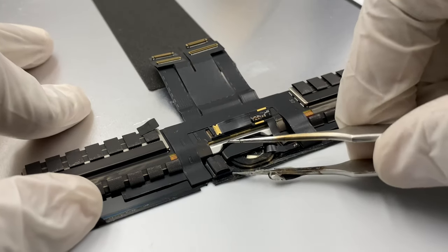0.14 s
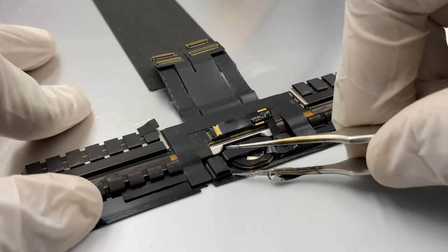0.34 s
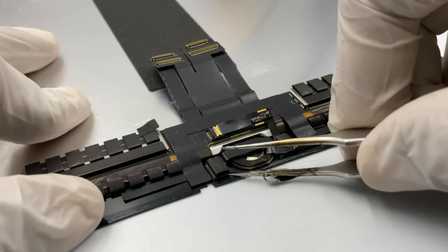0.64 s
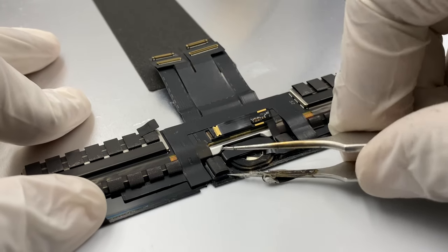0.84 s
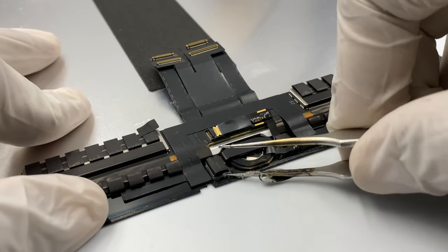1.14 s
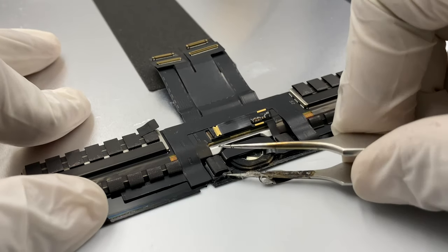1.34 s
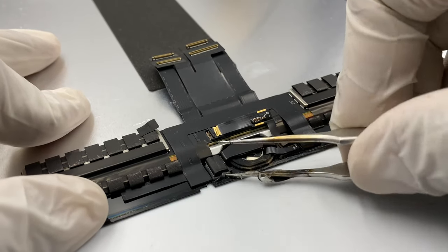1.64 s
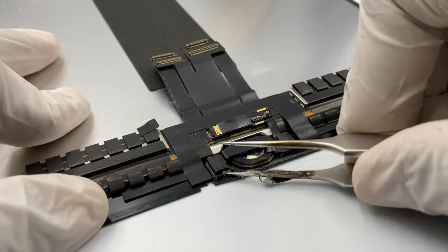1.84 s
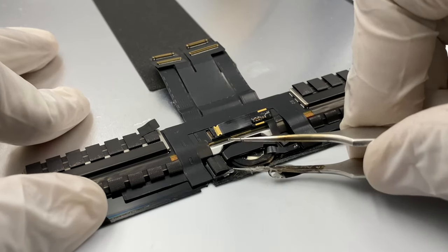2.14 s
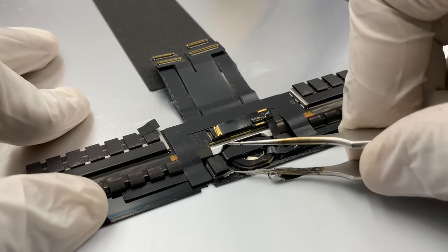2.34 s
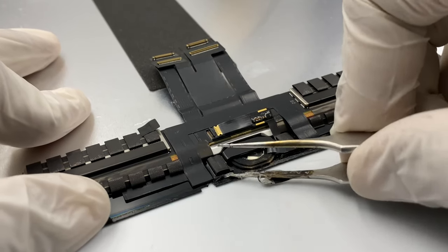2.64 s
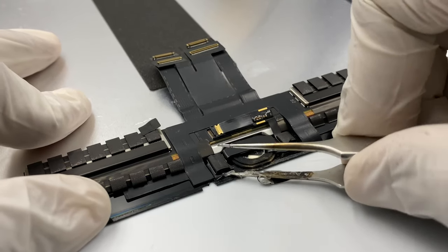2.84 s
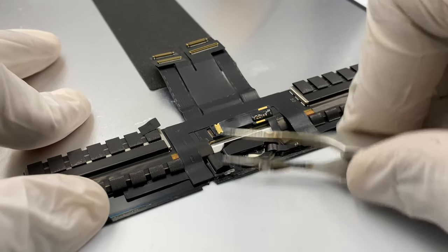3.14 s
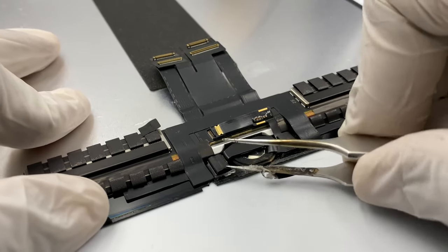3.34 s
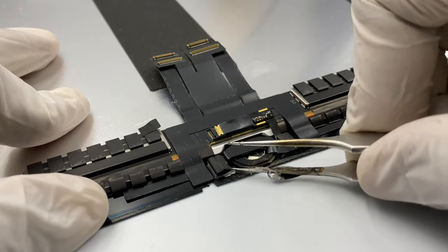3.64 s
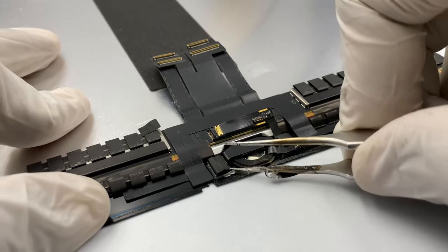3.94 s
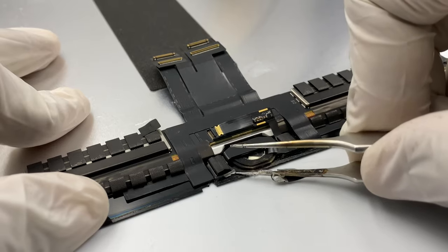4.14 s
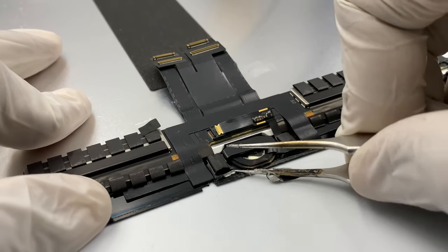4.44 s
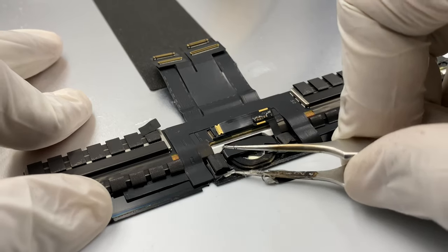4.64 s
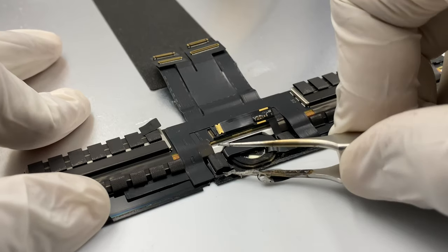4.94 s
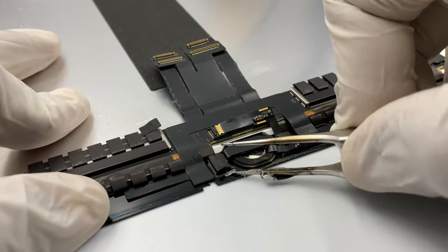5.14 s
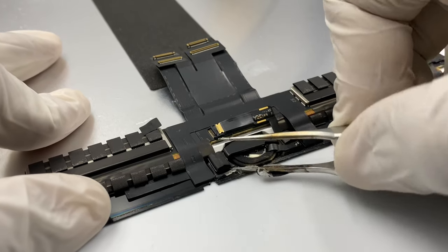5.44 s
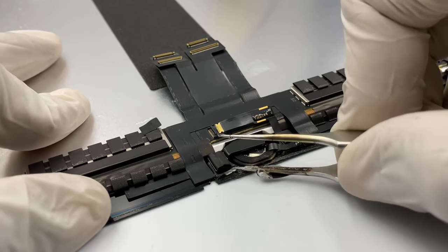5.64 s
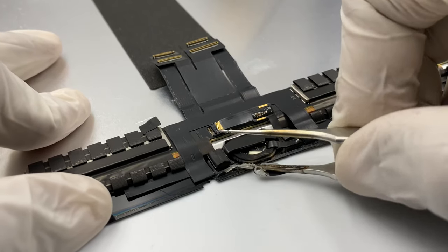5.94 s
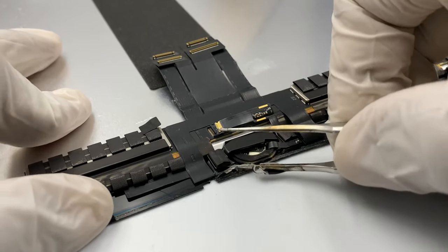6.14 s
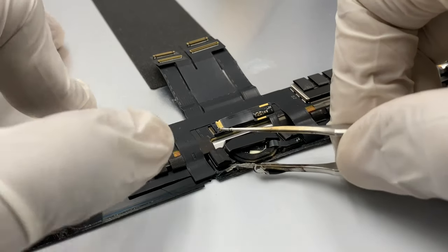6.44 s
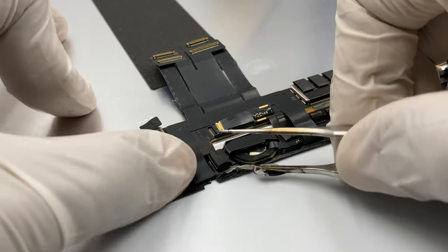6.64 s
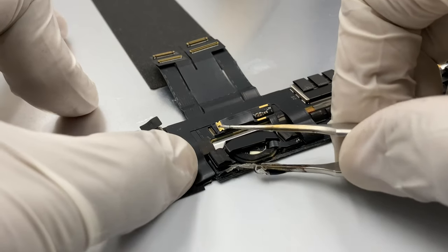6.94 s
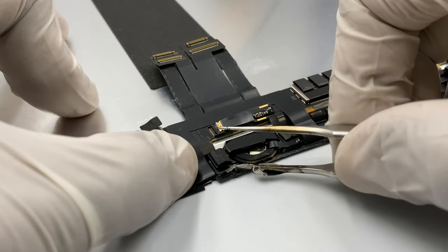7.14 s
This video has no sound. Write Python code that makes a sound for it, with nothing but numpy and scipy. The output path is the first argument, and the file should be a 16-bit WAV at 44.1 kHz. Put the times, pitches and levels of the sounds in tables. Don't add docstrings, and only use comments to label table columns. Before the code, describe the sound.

Close, dry metallic ticks and five sharp tweezer snaps, the last one loudest, with faint glove rubbing above a low constant fan drone.

```python
import sys
import numpy as np
from scipy import signal
from scipy.fft import rfft, irfft
from scipy.io import wavfile
from scipy.ndimage import uniform_filter1d

SR = 44100
rng = np.random.default_rng(int(sys.argv[2]) if len(sys.argv) > 2 else 0)


def gain_from_decibels(decibels):
    exponent = np.asarray(decibels, float) / 20
    return 10 ** exponent


def wav_record(signal):
    frames = np.transpose(np.atleast_2d(signal))
    bounded = np.clip(frames, -1, 1)
    quanta = np.round(bounded * 32767).astype(np.int16)
    wavfile.write(sys.argv[1], SR, quanta)


N = 321048
TIME = np.arange(N) / SR
HZ = np.maximum(np.arange(N // 2 + 1) * SR / N, 1)
SIDES = np.array([[1], [-1]])


def rms_one(x):
    return x / np.sqrt(np.mean(x ** 2) + 1e-20)


def in_time(rows):
    s, *columns = np.transpose(rows)
    return [np.interp(TIME, s, c) for c in columns]


def at_hz(rows, column=1, hz=HZ):
    table = np.array(rows)
    return np.interp(np.log(hz), np.log(table[:, 0]), table[:, column])


def drift(rate):
    r = np.exp(-80 * np.pi * rate / SR)
    slow = signal.lfilter([1], [1, -2 * r, r * r], rng.standard_normal(N // 40 + 2002))[2000:]
    return np.interp(np.arange(N) / 40, np.arange(len(slow)), rms_one(slow))


def pair(shared, lag_s, source):
    common, left, right = rfft(source)
    shared = np.clip(shared, 0, 1)
    late = np.exp(-2j * np.pi * np.minimum(HZ * lag_s, 3))
    together = np.sqrt(shared) * common * np.array([late, np.ones_like(late)])
    return together + np.sqrt(1 - shared) * np.array([left, right])


def ring(force, modes):
    out = 0
    for k, (hz, level_db, t60) in enumerate(modes):
        r = gain_from_decibels(-60 / (t60 * SR))
        w = 2 * np.pi * hz / SR
        gain = (-1) ** k * gain_from_decibels(level_db) * np.sin(w)
        out = out + signal.lfilter([0, gain], [1, -2 * r * np.cos(w), r * r], force + 1e-18)
    return out


def contacts(times, level_db, pan_db, rough, slip_s):
    t = np.arange(rough.shape[-1]) / SR
    slips = rough * t * np.exp(-t / slip_s)
    slips = slips / np.sqrt(np.sum(slips ** 2, axis=-1, keepdims=True))
    force = np.zeros((2, N + len(t)))
    for s, db, pan, slip in zip(times, level_db, pan_db, slips):
        start = round(s * SR)
        force[:, start:start + len(t)] += slip * gain_from_decibels(db + pan * SIDES / 2)
    return force[:, :N]


# frequency in Hz, level in dB, t60 in s.
TIP_MODES = [(7340, 2.5, 0.0032), (7960, -2, 0.0099), (8500, 1, 0.0057), (9220, 2, 0.01),
             (9850, 9.5, 0.0045), (10760, 6, 0.0068), (11470, 5.5, 0.0043)]
# frequency in Hz, level in dB, t60 in s.
BOARD_MODES = [(1215, 14, 0.0054), (1410, -12, 0.02), (1760, 7.5, 0.017), (1980, -2, 0.07),
               (2270, 7.5, 0.0075), (2850, 5, 0.012), (3340, 4.5, 0.012)]
# frequency in Hz, level in dB, t60 in s.
ARM_MODES = [(3350, 1.2, 0.0031), (4100, 2.3, 0.0054), (4450, 3.4, 0.0087), (4730, 5.4, 0.0077),
             (5580, 6.1, 0.0062), (6230, 4.7, 0.0037), (7030, 0.61, 0.0033)]
# frequency in Hz, level in dB, t60 in s.
EDGE_MODES = [(12300, -8, .005), (12750, 11.5, 0.0071), (14100, 8, 0.0079), (14800, 7, 0.006),
              (15600, 2, .003)]


def ticks(rows):
    s, tip_db, board_db, arm_db, edge_db = np.transpose(rows)
    rough = rng.standard_normal((len(s), 2, 260))
    crackle = rng.standard_normal((len(s), 2, 1200)) * rng.standard_normal((len(s), 1, 1200)) ** 2
    scuff_db, scuff_s = -12, 0.0062
    click = np.eye(1, 4096)
    out = 0
    for modes, db in ((TIP_MODES, -8.0), (BOARD_MODES, board_db - 6.0), (ARM_MODES, arm_db - 5.0),
                      (EDGE_MODES, edge_db)):
        force = contacts(s, tip_db + db, 0 * s, rough, slip_s=0.00041)
        force = force + contacts(s - scuff_s, tip_db + db + scuff_db, 0 * s, crackle, scuff_s)
        out = out + signal.oaconvolve(force, ring(click, modes), axes=1)
    return out[:, :N]


# time in seconds, tip ring peak in dB,
# then board, arm and edge in dB above the tip ring.
BOUNCES = [(3.125, -43.5, -5, 5.5, -10), (3.1362, -43.5, -6, -4, -5), (3.16, -25.5, -26, -6, -12),
           (3.165, -48, -8, -13, -10), (6.3665, -43, -8, -3, -15.5), (6.371, -48, -24, -3.5, -9),
           (6.3423, -43.5, -26, -2, -15)]
# time in seconds, tip ring peak in dB,
# arm in dB above the tip ring.
GLANCES = [(0.3442, -42.5, 0), (0.3675, -49, 3), (0.357, -54, -2), (0.3987, -51, 3), (0.453, -51, 5),
           (0.979, -45.5, -7), (1.019, -46.5, -3), (1.0879, -53, -9), (1.215, -47, -5), (1.4405, -47, -7),
           (1.484, -47, -7), (1.52, -45, -6), (1.536, -50.5, 2), (1.719, -45.5, 0), (2.386, -54, -10),
           (3.714, -47.5, -3), (3.773, -44, -4.5), (4.3862, -47, -5), (4.8713, -52, -3), (4.367, -58, -5),
           (5.282, -50, -6), (5.3057, -48, -11), (5.324, -42.5, -10), (5.5513, -54, -12),
           (5.5812, -55, -12), (5.747, -48.5, 0.5), (5.808, -47, -1.5), (6.0426, -38, -7),
           (6.1287, -35, -8), (6.187, -47, 1), (6.116, -59, -8), (6.151, -56, -8), (6.194, -54, -10),
           (6.233, -42.5, -16), (6.268, -51, -10), (6.2781, -44, -15), (6.296, -37.5, -3), (6.323, -46, -2)]
# time in seconds, tip ring peak in dB, push in dB above the tip ring.
POKES = [(0.151, -52.5, -7), (0.184, -48, -5), (0.243, -56, -7), (0.2497, -42.5, -16), (0.272, -45, -5),
         (0.4063, -49.5, 1), (0.9368, -53, -11), (1.4267, -67, -1), (1.474, -55, -3), (1.909, -59.5, 11),
         (1.96, -47, -13), (2.508, -56, -7), (2.7906, -49.5, -7), (2.8258, -49, -8), (2.876, -48.5, -4),
         (2.9352, -44, -12.5), (3.1095, -50, -6), (3.485, -54, 2.5), (4.4303, -49.5, -6),
         (4.8307, -50.5, -5), (5.015, -54, -1.5), (5.09, -55, 3), (5.11, -57, 0), (5.417, -57.5, 4),
         (5.605, -55, 1), (5.681, -52, -1.5), (5.8383, -53.5, -1), (0.637, -57, -6), (6.3352, -39, -19),
         (6.9063, -49, -7), (2.88, -57, -6), (2.89, -64, 3), (4.309, -50, -6), (4.32, -49, -12),
         (4.33, -50, -10), (4.34, -52, -4), (6.288, -50, -10)]


def light_contacts():
    glances = [(s, db, -17, arm_db, -14) for s, db, arm_db in GLANCES]
    pokes = [(s, db, push_db, push_db + 3, -15) for s, db, push_db in POKES]
    return ticks(BOUNCES + glances + pokes)


# time in seconds, tip ring peak in dB,
# then board and arm in dB above the tip ring.
BRUSHES = [(.283, -62, 2, 0), (0.326, -54.5, 1, 5), (.608, -63, 4, 6), (0.62, -55, 4, 9),
           (1.225, -60, -20, -15), (1.35, -63, -20, -20), (1.362, -61, -20, -20), (1.378, -55, -20, -20),
           (1.395, -65, -20, -20), (3.131, -50, -15, -5), (3.144, -56, -20, -15), (6.004, -54, -20, -15),
           (6.012, -57, -20, -15), (6.032, -60, -20, -15), (6.141, -56, -18, -15), (6.331, -50, -15, 3),
           (6.346, -52, -15, 3), (6.379, -45, -18, 2), (6.383, -35, -8, 2), (6.389, -46, -8, 4),
           (6.397, -53, -13, 1), (6.411, -55, -15, 5), (4.311, -55, -20, -20), (4.433, -53, -12, 4),
           (.297, -56, 2, 7), (.309, -53, 6, 6), (.317, -58, 3, 4), (1.909, -57, 11, 12),
           (6.044, -60, 3, 5), (6.13, -58, 6, 9), (1.557, -62, 14, 0), (3.49, -68, 3, 0)]


def faint_brushes():
    edge_db = -19
    return ticks([row + (edge_db,) for row in BRUSHES])


# time in seconds, level in dB, left minus right in dB.
HARD_SLIPS = [
    (2.17, -9, 0.5),
    (3.1563, -5, 2.5),
    (4.09, -5.5, 2),
    (5.259, -15, 4),
    (6.373, 2.5, -0.5),
]
# frequency in Hz, level in dB per Hz.
SLIP_COLOURS = [
    [(710, -47), (1200, -26), (2410, -3.5), (3310, -14), (4550, -12), (6590, -31), (8560, -21), (9440, 1),
     (12300, -21), (14500, -5), (16300, -45)],
    [(530, -50), (900, -10), (1410, 3), (2100, -10), (2680, -8), (4090, -6), (4970, -5), (12300, -6),
     (14300, -3), (15200, -25), (16300, -45)],
    [(530, -40), (900, -10), (2460, -3.5), (3250, -11), (5000, -7), (7150, -13), (8470, -15), (9450, -5),
     (12500, -22), (14000, -24), (16300, -27)],
    [(880, -55), (1500, -18), (3800, 2), (8430, -19), (9600, -12), (16300, -26)],
    [(710, -54), (1250, -27), (2690, -9.5), (3310, -13.5), (5000, -2.5), (5800, -4), (6500, -3),
     (7350, -14), (8940, 0.5), (12100, -18), (14500, -10.5), (16300, -20)],
]


def hard_slips():
    out = np.zeros((2, N))
    t = np.arange(2048) / SR
    hz = np.arange(1, 1026) * SR / 2048
    lead_s = .005
    late = np.maximum(t - lead_s, 0)
    for (s, level_db, pan_db), colour in zip(HARD_SLIPS, SLIP_COLOURS):
        chatter = rfft(rng.standard_normal((2, 2048)) * late * np.exp(-late / 0.00053))
        even = chatter / np.sqrt(uniform_filter1d(abs(chatter) ** 2, size=7))
        snap = irfft(even * gain_from_decibels(at_hz(colour, hz=hz)))
        snap = snap / np.sqrt(np.sum(snap ** 2, axis=1, keepdims=True))
        start = round((s - lead_s) * SR)
        out[:, start:start + 2048] += gain_from_decibels(level_db + pan_db * SIDES / 2) * snap
    return out


# frequency in Hz, level in dB, t60 in s.
SNAP_MODES = [(1570, -42.5, 0.017), (4850, -59, 0.0224), (7400, -48, 0.015), (11400, -36, 0.025),
              (14020, -50.5, .03)]


def tweezers_ring(snaps):
    return ring(snaps, SNAP_MODES)


# frequency in Hz, peak in dB, t60 in s.
SLIP_TONES = [
    [(1950, -49, 0.03), (2300, -42, .02), (2570, -33, 0.014), (3860, -43, .03), (4550, -41, .025),
     (7400, -47, .04), (9800, -47, .03), (11690, -50, .025), (14150, -51, .045)],
    [(1300, -24, 0.027), (1605, -28.5, 0.045), (1780, -32, 0.046), (2594, -30, 0.034), (5020, -25, 0.026),
     (5260, -41, .03), (6440, -50, .02), (9600, -37, .03), (11560, -27, 0.025), (12580, -38, .014),
     (13760, -40, .03), (14440, -41, .025)],
    [(694, -39, 0.034), (1190, -32.5, 0.034), (1410, -45, .025), (1850, -30, .018), (2080, -34, .015),
     (2250, -37, 0.013), (2560, -20.5, 0.014), (2940, -42, .023), (3740, -23.5, 0.015),
     (4640, -22.5, 0.015), (5240, -34, .015), (7140, -33, .025), (7500, -32, 0.03), (9670, -26, 0.016),
     (9500, -27, .02), (11500, -43, 0.022), (13980, -48, .04)],
    [(2350, -47, 0.053), (3000, -38, 0.028), (3880, -54, 0.02), (4700, -57, 0.026), (7994, -43, .019),
     (9500, -42.5, .04), (12900, -56, .02), (14400, -56, .02)],
    [(2700, -24, 0.01), (4000, -17.5, .012), (5500, -20, 0.012), (6160, -26, 0.011), (6330, -20, .015),
     (7700, -42.5, 0.0248), (9200, -20, 0.013), (9700, -43, 0.049), (10300, -39, .02), (14200, -37, 0.018)],
]


def slip_rings():
    out = np.zeros((2, N))
    t = np.arange(2048) / SR
    rise = 1 - np.exp(-t / 0.00024)
    for (s, _, pan_db), modes in zip(HARD_SLIPS, SLIP_TONES):
        skews = 0.82 * rng.choice([-1, 1], len(modes))
        start = round(s * SR)
        for (mode_hz, db, t60), skew in zip(modes, skews):
            wave = np.sin(2 * np.pi * mode_hz * t + skew * SIDES) * rise
            out[:, start:start + len(t)] += gain_from_decibels(db - 60 * t / t60 + pan_db * SIDES / 2) * wave
    return out


# time in seconds, peak in dB,
# brightness in dB, left minus right in dB.
KNOCKS = [(1.373, -48, -1, 12), (1.3835, -37.5, -18.5, 23.5), (1.398, -39, -10, 8), (1.442, -42, -11, 4),
          (1.535, -39, -16, 4), (1.555, -42, -12, 8), (1.571, -46, -18, 1), (2.171, -40, -14, -4),
          (2.957, -35, -16.5, 7), (3.16, -35.5, -8, 1), (3.811, -40.5, -18, 4), (4.092, -39.5, -25, 9),
          (4.998, -37, -16, 6), (5.094, -46, -14, 8), (5.259, -40.5, -16, 4), (6.372, -45, -5, -9)]
# frequency in Hz, level in dB, t60 in s.
KNOCK_LOW = [(270, 10.5, 0.04), (430, 2, 0.043), (593, 4, 0.042), (723, 9, 0.023), (963, 13.5, 0.0089)]
# frequency in Hz, level in dB, t60 in s.
KNOCK_HIGH = [(1213, 22.5, 0.022), (1480, 19, 0.023), (1690, 19.5, 0.0106), (2250, -6, 0.0082)]


def knocks():
    s, low_db, high_db, pan_db = np.transpose(KNOCKS)
    rough = 1 + .5 * rng.standard_normal((len(s), 2, 300))
    out = ring(contacts(s, low_db - 16.5, pan_db, rough, slip_s=0.00015), KNOCK_LOW)
    out = out + ring(contacts(s, low_db + high_db - 16.5, pan_db, rough, slip_s=0.00009), KNOCK_HIGH)
    out = signal.sosfilt(signal.butter(3, [330.0, 1900.0], "band", fs=SR, output="sos"), out)
    out[1] = np.roll(out[1], 16)
    return out


# time in seconds, boom peak in dB, tap in dB above the boom.
THUMPS = [
    (2.171, -27, 6),
    (2.868, -30, -5),
    (3.154, -26, 7),
    (4.085, -22, 1),
    (5.26, -32.5, -2),
]
# frequency in Hz, level in dB, t60 in s.
BENCH_BOOM = [(83.4, 1.5, 0.26), (101.4, -4, 0.89)]
# frequency in Hz, level in dB, t60 in s.
BENCH_TAP = [(183, 6.5, 0.12), (207, -14, 0.043)]


def thumps():
    s, peak_db, tap_db = np.transpose(THUMPS)
    push = np.ones((len(s), 2, 1200))
    boom = 0
    for db, modes in ((peak_db, BENCH_BOOM), (peak_db + tap_db, BENCH_TAP)):
        boom = boom + ring(contacts(s + 0.0033, db - 28.5, 0 * s, push, slip_s=0.0015), modes)
    boom = signal.sosfilt(signal.butter(2, 60.0, "high", fs=SR, output="sos"), boom)
    boom[0] = np.roll(boom[0], 110)
    return boom


def strokes(rows, rise_s, fall_s):
    out = 0
    for s, length, db, swell_db in rows:
        end, end_db = s + max(length, 0), db + swell_db
        corners = [s - 3 * rise_s, s, end, end + 3 * fall_s]
        out = out + gain_from_decibels(np.interp(TIME, corners, [db - 90, db, end_db, end_db - 90]))
    return out


def grains(per_s, spread_db, clump_db, colour):
    born = rng.random((3, N)) < per_s * gain_from_decibels(clump_db * drift(40.0)) / SR
    sizes = gain_from_decibels(spread_db * np.minimum(rng.exponential(1, (3, N)), 5)) * rng.choice([-1, 1], (3, N))
    return rms_one(irfft(pair(0.7, -0.000201, born * sizes) * gain_from_decibels(at_hz(colour)), N))


# start in seconds, length in seconds, level in dB at the start, swell in dB.
DRAGS = [
    (.19, 0.076, -61, 2),
    (.275, 0.058, -54, 0.5),
    (.39, 0.033, -67, -10),
    (4.308, 0.029, -54.5, 1),
    (5.264, 0.095, -58, -22),
    (6.285, 0.094, -65, -1),
]
# frequency in Hz, level in dB per Hz.
SCRAPE = [(700, -23), (1250, -7), (1780, -1.5), (2400, -10), (3700, -12), (5000, -13.5), (7500, -13),
          (9500, -14.5), (12300, -18), (14300, -29.5), (16300, -41.5)]


def scrape():
    return strokes(DRAGS, 0.013, 0.014) * gain_from_decibels(2.5) * grains(3000, spread_db=2.5, clump_db=2.5, colour=SCRAPE)


# time in seconds, pitch in Hz, level in dB.
SQUEAK = [
    (4.298, 1950, -83),
    (4.309, 2125, -47),
    (4.325, 2693, -45.5),
    (4.334, 2250, -45),
    (4.342, 1980, -82),
]


def squeak():
    pitch_hz, level_db = in_time(SQUEAK)
    phase = 2 * np.pi * np.cumsum(pitch_hz * (1 + .035 * drift(200))) / SR
    octave = 0.34 * np.exp(-np.abs(TIME - SQUEAK[1][0]) / 0.0074) * np.sin(2 * phase)
    return gain_from_decibels(level_db) * (np.sin(phase + np.array([[0], [1.5]])) + octave)


# first slip in seconds, gap in seconds, slip in dB.
JUDDERS = [
    (.578, .0075, 7),
    (.829, .009, 10),
]


def judder():
    gain_db = np.zeros(N)
    unevens = rng.uniform(0.89, 0.99, (len(JUDDERS), 8))
    for (s, gap_s, db), uneven in zip(JUDDERS, unevens):
        slip_times = s + gap_s * (np.cumsum(uneven) - uneven[0])
        for k, slip_time in enumerate(slip_times):
            late = TIME - slip_time
            burst = 2 * np.exp(-np.maximum(late, 0) / .0025) - 1
            gain_db += (db - .6 * k) * (late > 0) * (late < gap_s) * burst
    return gain_from_decibels(gain_db)


# start in seconds, length in seconds, level in dB at the start, swell in dB.
RUBS = [
    (0.0, 0.05, -81, 2),
    (.16, 0.17, -72, -1),
    (.52, 0.098, -64.5, 4),
    (.83, 0.13, -63, 0),
]
# frequency in Hz, level in dB per Hz.
HISS = [(6000, -13), (7900, -18), (9300, -13), (11500, -7), (12300, -5), (13300, -3), (14600, -11),
        (15500, -10), (16400, -37)]


def glove_rub():
    fine = grains(9000, spread_db=0.0, clump_db=-10.5, colour=HISS)
    return strokes(RUBS, .02, .035) * judder() * gain_from_decibels(1.0) * fine


# start in seconds, length in seconds, level in dB at the start, swell in dB.
GRIPS = [(1.43, .1, -84, 6), (1.85, .17, -83, -8), (2.43, .05, -90, 8), (2.86, .1, -81, -2),
         (3.75, 0.13, -80.5, 7), (4.9, 0.3, -77, -13), (5.65, 0.14, -89, 3), (6.03, 0.31, -78, 0),
         (6.43, 0.28, -86, 1)]
# frequency in Hz, level in dB per Hz.
DULL_HISS = [(6000, -7), (8000, -5), (9700, -6), (11300, -9), (12300, -6.5), (13600, -7.5), (15000, -14.5),
             (16400, -34)]


def grip_shift():
    grip = strokes(GRIPS, 0.15, 0.17) + gain_from_decibels(-82)
    return grip * gain_from_decibels(6.5) * grains(9000, spread_db=4.0, clump_db=-2.0, colour=DULL_HISS)


def nearby(x):
    t = np.arange(SR // 3) / SR
    tail = gain_from_decibels(-27.0 - 60 * t / 0.037) + gain_from_decibels(-44.0 - 60 * t / 0.23)
    echoes = rng.standard_normal((2, len(t))) * tail * (t > .002)
    echoes = signal.sosfilt(signal.butter(2, [250.0, 10500.0], "band", fs=SR, output="sos"), echoes)
    return signal.fftconvolve(x, echoes, axes=1)[:, :N]


# time in seconds, lowest hum in Hz.
MOTOR = [(0, 169.43), (1.3, 169.4), (2.2, 169.25), (7.28, 169.19)]
# multiple of the lowest hum, left in dB, right in dB, right's lead in radians, waver in dB.
HUM = [(1, -41.5, -50.5, 0.22, 0.5), (2, -52, -44.5, 1.02, 0.87), (3.926, -60.5, -59, 2.5, 8),
       (19, -72, -73, 0.63, 1.5), (20, -74.5, -78, 0.42, 3.5), (33, -69, -69.5, 0.15, 3.5)]
# time in seconds, level in dB.
WHINE = [(0, -8), (2.0, -6), (2.45, -8.5), (3.1, 1.5), (4.2, -9.5), (4.85, 1.5), (5.38, -10.5), (5.6, -5.5),
         (7.28, 0)]


def hum():
    turn = 2 * np.pi * np.cumsum(in_time(MOTOR)[0]) / SR
    whine_db = in_time(WHINE)[0]
    out = 0
    for order, left_db, right_db, lead, waver_db in HUM:
        phase = round(order) * turn + rng.uniform(0, 2 * np.pi) + np.array([[0], [lead]])
        swell_db = min(waver_db, 1 if order > 4 else 4) * drift(3.2) + whine_db * (order > 30)
        out = out + np.sqrt(2) * gain_from_decibels(np.array([[left_db], [right_db]]) + swell_db) * np.sin(phase)
    return out


# frequency in Hz, level in dB per Hz.
AIR = [(20, -27), (52, -11.5), (100, -8.5), (250, -9), (430, -16.5), (800, -19), (1280, -20), (1900, -31.5),
       (4000, -33), (7800, -53.5), (10500, -57.5), (12300, -62), (14200, -68), (16400, -102)]
# frequency in Hz, width in Hz, level in dB.
DUCT = [(67.6, 7.2, 13), (78.5, 28, 6.5), (194, 5.8, 2.5), (263, 13, 5.5), (678.5, 150, 9.5),
        (1073, 36, 5.5), (1380, 42, 5), (1780, 40, 5), (1950, 100, -7.5), (2504, 330, 4.5), (4000, 46, 4.5),
        (4950, 660, -5), (5980, 1530, 6)]
# frequency in Hz, shared part from 0 to 1, left minus right in dB.
AIR_PAIR = [(40, .65, 1.5), (100, .7, 1.5), (300, .7, 0.3), (700, .88, .7), (1300, .86, -1.2),
            (1900, .3, -2.5), (3300, .4, 1.5), (4600, .1, 1), (6200, .5, -1), (7500, .3, -1),
            (10000, .7, -1)]


def air():
    bumps_db = sum(db / (1 + (2 * (HZ - hz) / width) ** 2) for hz, width, db in DUCT)
    tilt_db = at_hz(AIR_PAIR, column=2) / 2 * SIDES
    lag_s = 0.00046
    spectra = pair(at_hz(AIR_PAIR), lag_s, rng.standard_normal((3, N)))
    spectra = spectra * gain_from_decibels(at_hz(AIR) + bumps_db + tilt_db)
    spectra[0] *= np.exp(-1j * 0.95 / (1 + (2 * (HZ - 96.6) / 42) ** 2))
    low = 1 / (1 + (HZ / 130) ** 4)
    rumble = irfft(spectra * low, N) * gain_from_decibels(0.38 * drift(6.7))
    return gain_from_decibels(-45.5) * rms_one(rumble + irfft(spectra * (1 - low), N))


# frequency in Hz, rms level in dB.
DRONE = [
    (46.8, -60),
    (35.7, -72),
]


def drone():
    out = 0
    for hz, db in DRONE:
        tone = np.sin(2 * np.pi * hz * TIME + np.array([[0], [.7]]))
        out = out + np.sqrt(2) * gain_from_decibels(db + drift(1.4)) * tone
    return out


def scene():
    snaps = hard_slips()
    work = light_contacts() + snaps + tweezers_ring(snaps) + knocks() + thumps()
    friction = scrape() + squeak() + glove_rub() + grip_shift()
    background = hum() + air() + drone()
    return work + slip_rings() + nearby(work) + faint_brushes() + friction + background


def band_gate(x):
    hz, _, cells = signal.stft(x, SR, nperseg=1024)
    bands = cells[:, :512].reshape(2, 32, 16, -1)
    level_db = 10 * np.log10(np.mean(abs(bands) ** 2, axis=(0, 2)) + 1e-30)
    treble = hz[8:512:16, None] > 6020
    loudest_db = np.max(np.where(treble, level_db, -300), axis=0)
    bar_db = np.clip(loudest_db - 8.5, -111, -97.5)
    shut = np.repeat(treble * np.clip(bar_db - level_db, 0, 1), 16, axis=0)
    gain = gain_from_decibels(-30 * np.vstack([shut, shut[-1:]]))
    return signal.istft(cells * gain, SR, nperseg=1024)[1][:, :N]


def low_pass(x):
    return signal.sosfilt(signal.butter(12, 16550, fs=SR, output="sos"), x)


def record(dry):
    x = signal.sosfilt(signal.butter(2, 22.0, "high", fs=SR, output="sos"), dry)
    notch_db = -14 / (1 + (2 * (HZ - 12160) / 860) ** 4)
    dip_db = -4.5 / (1 + (2 * (HZ - 8340) / 360) ** 2)
    x = irfft(rfft(x) * gain_from_decibels(notch_db + dip_db), N)
    x = signal.sosfilt(signal.cheby2(12, 60, 16900, fs=SR, output="sos"), band_gate(x))
    return low_pass(x)


dry = scene()
out = record(dry)
wav_record(out)
```